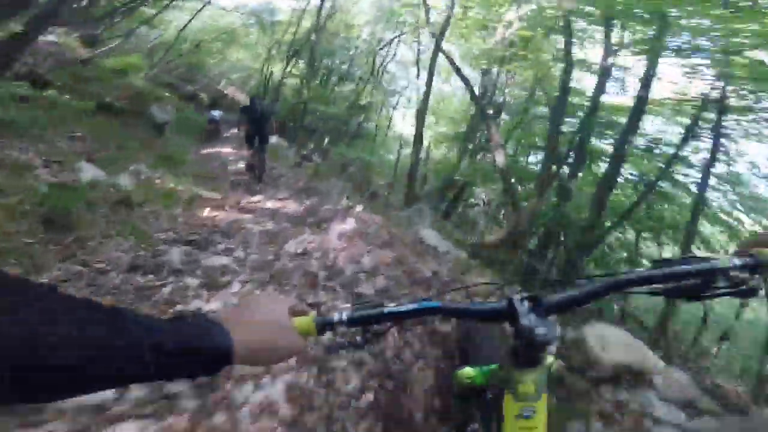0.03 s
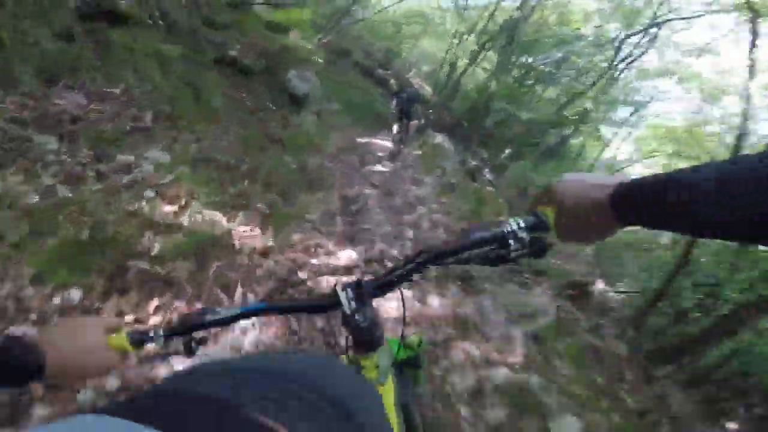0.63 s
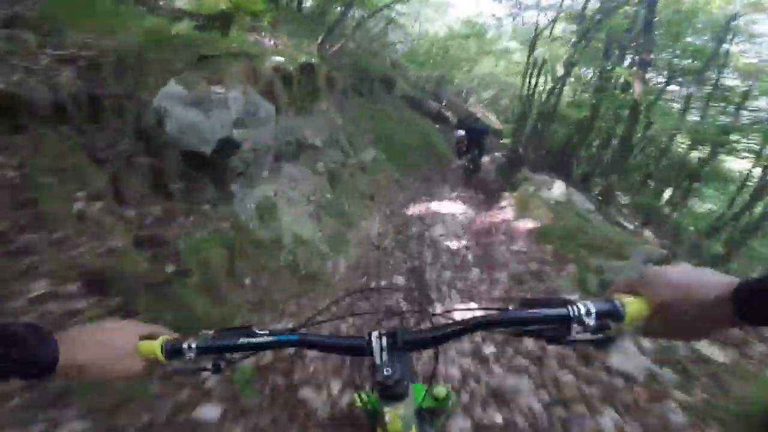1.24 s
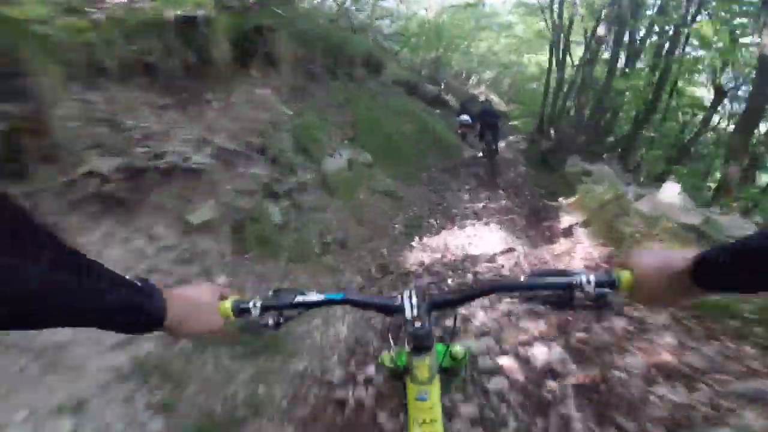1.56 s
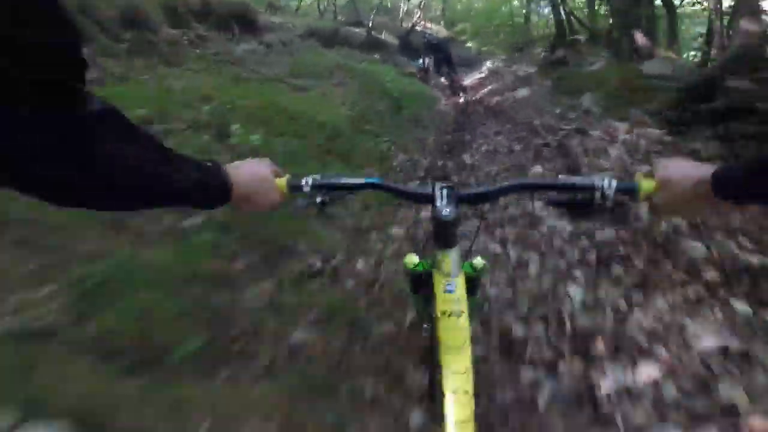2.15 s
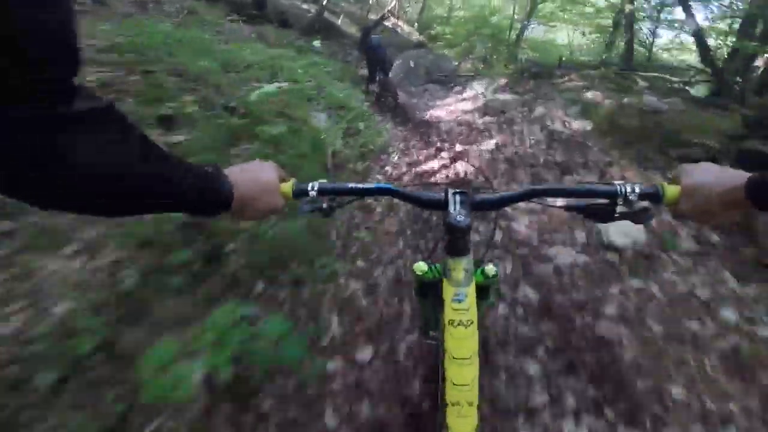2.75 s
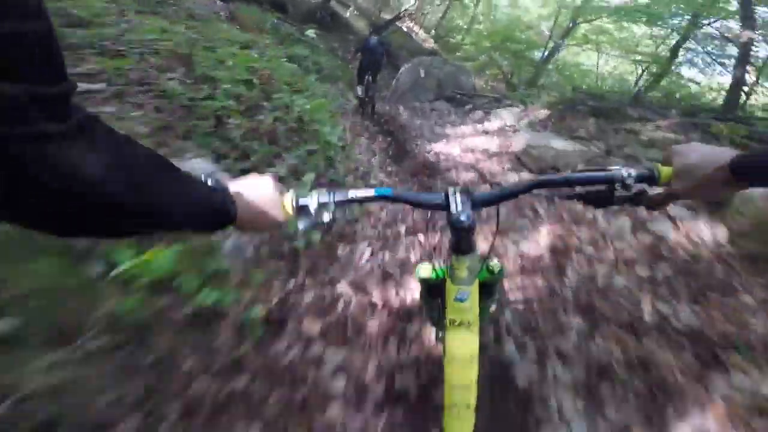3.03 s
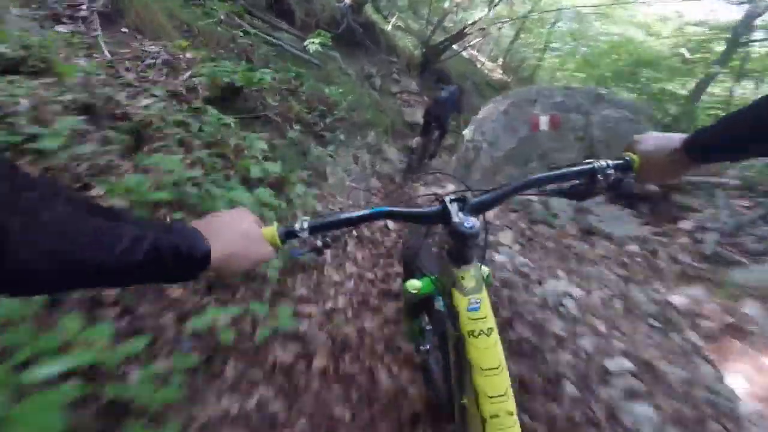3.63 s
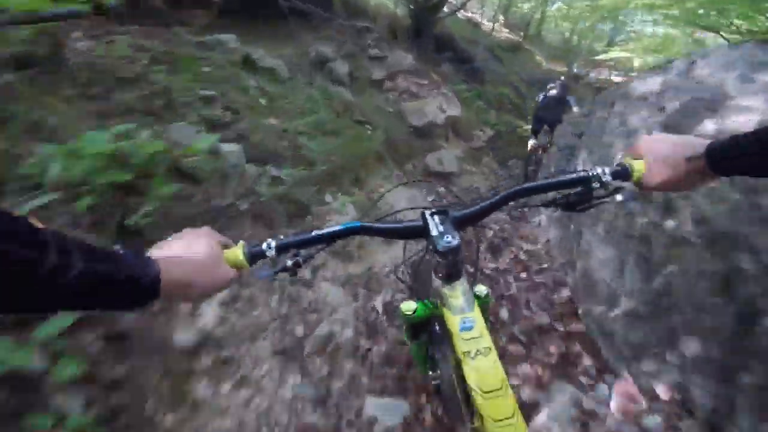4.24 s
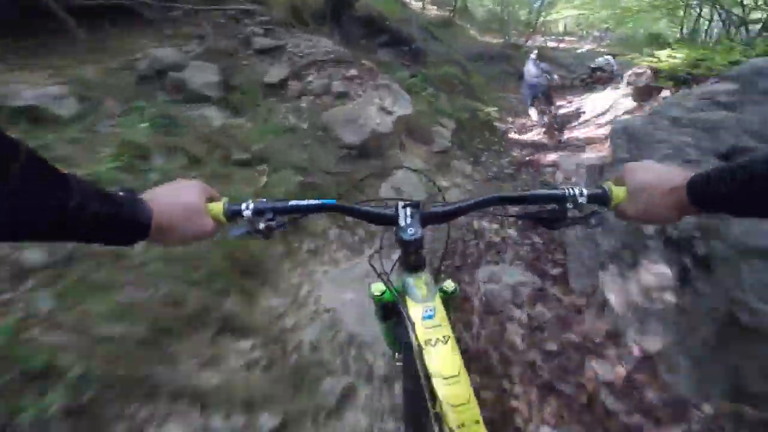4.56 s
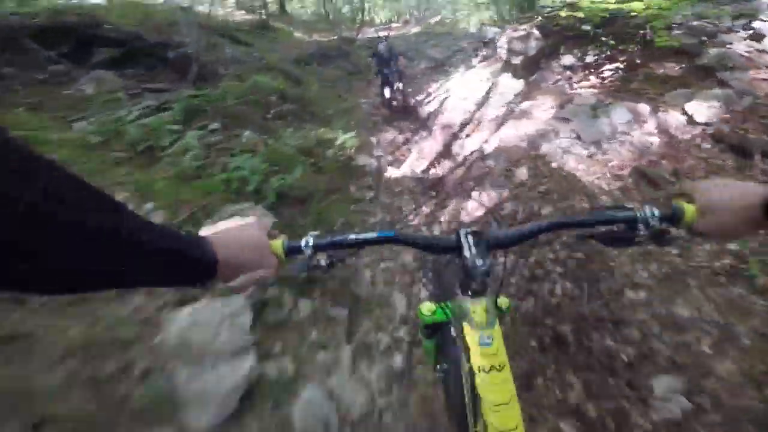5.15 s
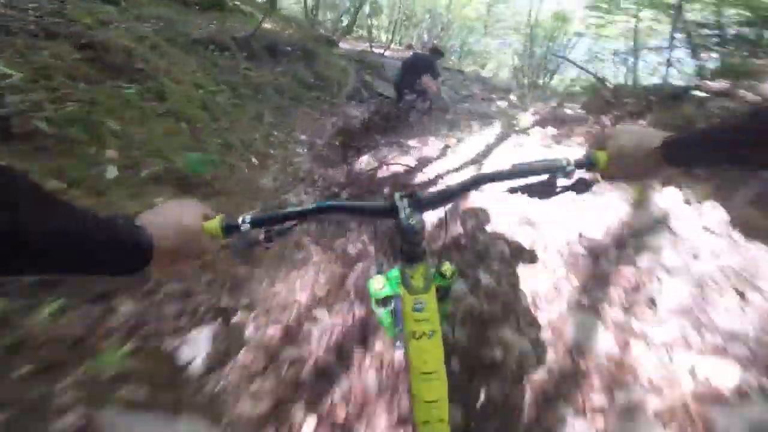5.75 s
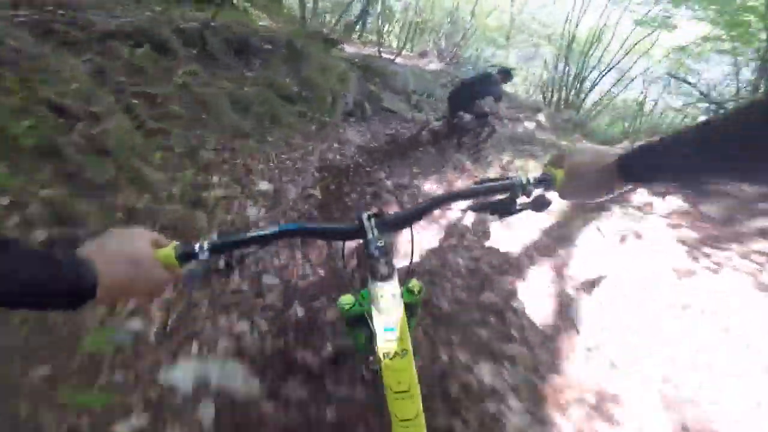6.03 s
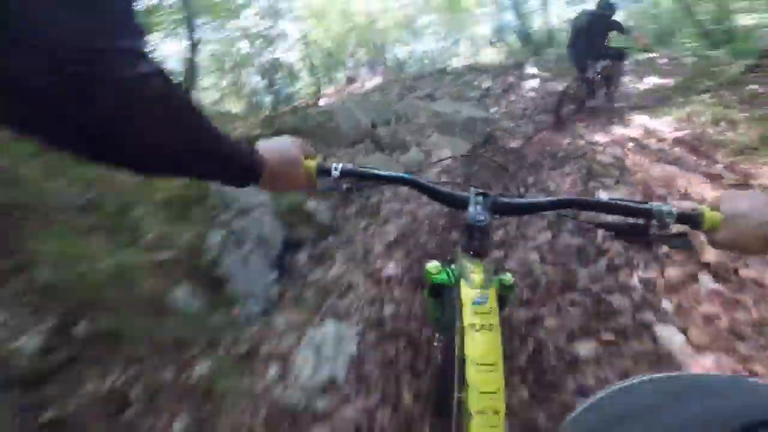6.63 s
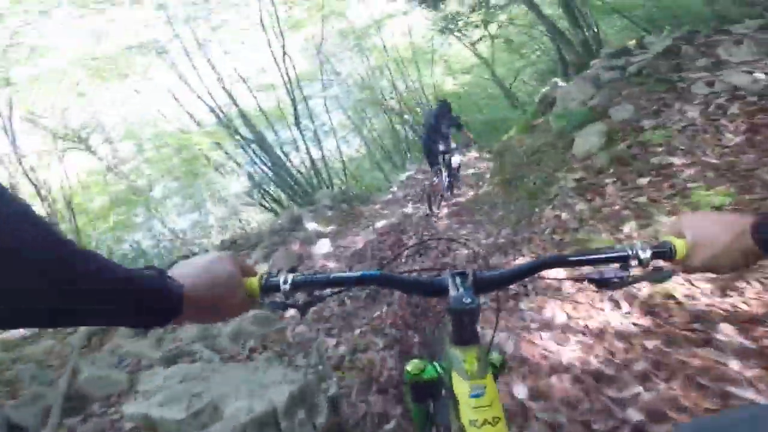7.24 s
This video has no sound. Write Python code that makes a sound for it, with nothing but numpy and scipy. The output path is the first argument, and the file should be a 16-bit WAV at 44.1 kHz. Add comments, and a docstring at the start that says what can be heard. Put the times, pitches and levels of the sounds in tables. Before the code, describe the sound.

Wind rumbles on a rider's microphone as bicycle tyres crackle through dry leaves and clack over loose stones, the bike thumping and ticking.

```python
"""A mountain bike rolls down a stony, leaf-covered forest trail, heard from a camera on the rider.
From the start air buffets the microphone, dry leaves crackle, bumps drum through tyres and frame, and
chain and cables tick. After a second the wind rises and the ground roughens; loose stones crunch and
clack, hardest near 3 s. The wind eases around 4 s and builds again, and near 6 s the tread slips on rock.
Short hops hush wind and tyres; after 7 s the ride quietens. Throughout, the camera case rings the treble."""
import sys
import numpy as np
from scipy import signal
from scipy.fft import rfft, irfft, next_fast_len
from scipy.io import wavfile
from scipy.ndimage import map_coordinates

SR = 44100
rng = np.random.default_rng(int(sys.argv[2]) if len(sys.argv) > 2 else 0)


def output_pcm(signal):
    """Save a mono or channel-first signal as 16-bit PCM at the path in sys.argv[1].

    Samples are clipped to [-1, 1] before scaling.
    """
    pcm = np.clip(np.atleast_2d(signal).T, -1, 1) * 32767
    wavfile.write(sys.argv[1], SR, np.round(pcm).astype(np.int16))


N = 330309


def amp(db):
    """Decibels to gain."""
    return 10 ** (np.asarray(db) / 20)


def unit(x):
    """x at rms 1."""
    return x / np.sqrt(np.mean(x ** 2) + 1e-20)


def automation(rows):
    """A fader ride: straight lines through (time_s, value) points."""
    time_s, values = np.transpose(rows)
    return np.interp(np.arange(N) / SR, time_s, values)


def gate(start_s, length_s, attack_s, release_s):
    """An envelope that opens around start_s, holds and closes once its length is over."""
    t = np.arange(N) / SR - start_s
    return np.clip(t / attack_s + .5, 0, 1) * np.clip(1 - (t - length_s) / release_s, 0, 1)


def wobble(rate):
    """A smooth random curve, rate knots a second."""
    return map_coordinates(rng.standard_normal(N // 50), [np.arange(N) * rate / SR], mode="wrap")


def filtered(x, response):
    """x through a complex frequency response."""
    size = 2 * next_fast_len(len(x) // 2 + 4096)
    return irfft(rfft(x, size) * response(np.fft.rfftfreq(size, 1 / SR)), size)[:len(x)]


def eq(x, points):
    """x through a minimum-phase EQ drawn by (freq_hz, gain_db) points."""
    freq_hz, gain_db = np.transpose(points)

    def response(hz):
        gain = amp(np.interp(np.log(hz + 1), np.log(freq_hz), gain_db))
        cepstrum = irfft(np.log(gain))
        half = len(cepstrum) // 2
        cepstrum[1:half] *= 2
        cepstrum[half + 1:] = 0
        return np.exp(rfft(cepstrum))
    return filtered(x, response)


def add(track, start_s, sound):
    """Mix a sound into the track at start_s."""
    part = track[max(round(start_s * SR), 0):][:len(sound)]
    part += sound[:len(part)]


def impacts(per_second, spread_db):
    """Randomly timed impulses of log-normal size, rms 1."""
    hits = rng.random(N) < per_second / SR
    polarity = np.sign(rng.standard_normal(N))
    return unit(hits * polarity * amp(spread_db * np.clip(rng.standard_normal(N), -2, 2)))


def grains(count, pitch_hz, pitch_spread, cycles, spread_db):
    """A cloud of small collisions, each a damped sine of its own pitch and size."""
    t = np.arange(int(SR * min(.02, 12 * cycles / pitch_hz))) / SR
    start = rng.integers(0, N, (count, 1))
    detune, size = np.clip(rng.standard_normal((count, 2)), -2, 2).T[:, :, None]
    turns = pitch_hz * np.exp(pitch_spread * detune) * t
    envelope = amp(spread_db * size) * np.exp(pitch_spread * detune / 2 - turns / cycles)
    pings = envelope * np.sin(2 * np.pi * turns) * rng.choice([-1, 1], (count, 1))
    samples = start + np.arange(len(t))
    return unit(np.bincount(samples.ravel(), pings.ravel(), N)[:N])


def tyre_load(per_second, settle_s):
    """The load on the tyres jumps at every stone and settles again; mean 0, rms 1."""
    kicks = rng.random(N) < per_second / SR
    load = np.sqrt(signal.lfilter([1], [1, -np.exp(-1 / (settle_s * SR))], kicks))
    return unit(load - load.mean())


# Fader ride of the airflow over the microphone: time_s, level_db
AIRFLOW = [(0, -18), (1.0, -18), (1.3, -13), (2.3, -14), (3.15, -17), (3.4, -17.5), (3.65, -15.5),
           (4.05, -22.5), (4.7, -21.5), (4.85, -18), (5.7, -16), (6.7, -15), (7.1, -22.5), (7.49, -24)]
# Gusts (+) and lulls (-) on top of it: start_s, length_s, change_db
GUSTS_AND_LULLS = [(0.01, 0.04, -3), (0.67, 0.1, -3.5), (0.965, 0.053, 1.5), (4.144, 0.042, 11),
                   (5.136, 0.18, -7.5), (6.844, 0.039, -10)]
# Bass-heavy tone of the buffeting: freq_hz, gain_db
WIND_EQ = [(5, -33), (22, 1.5), (75, 1.5), (120, -1.5), (200, -12), (350, -24.5), (700, -23.5), (2000, -55)]

def wind(lump_db=1.5, attack_s=0.028, release_s=0.019):
    """Eddies break on the microphone port in lumps; gusts and lulls ride on the airflow."""
    gust_db = sum(db * gate(s, length_s, attack_s, release_s) for s, length_s, db in GUSTS_AND_LULLS)
    eddies = eq(rng.standard_normal(N), WIND_EQ) * amp(lump_db * wobble(25))
    return amp(automation(AIRFLOW) + gust_db) * unit(eddies)


# Fader ride of the tyre noise, rising with speed: time_s, level_db
TYRE_NOISE = [(0, -37.5), (1.04, -37), (1.45, -32), (2.05, -33.5), (2.35, -30.5), (2.75, -33.5),
              (3.65, -34), (4.2, -38), (4.5, -32), (4.95, -31), (5.45, -33), (5.85, -30), (6.3, -33),
              (6.9, -30), (7.49, -35.5)]
# Crisp tone of dry leaves: freq_hz, gain_db
LEAF_EQ = [(100, -62), (700, 0.5), (2000, 12), (3200, 7), (4300, -0.5), (6500, 5), (8000, 1.5),
           (10200, -1.5), (15000, -8)]

def leaves(load, load_db=2.0, rustle_db=3, swell_db=1.0, trim_db=-1):
    """Dry leaves and twigs snap under the tyres, over a finer rustle; both swell at random."""
    snaps = grains(count=5000, pitch_hz=7300, pitch_spread=0.47, cycles=0.37, spread_db=-2.5)
    rustle = amp(rustle_db) * rng.standard_normal(N)
    pressed = (snaps + rustle) * amp(load_db * load + swell_db * wobble(27))
    return amp(automation(TYRE_NOISE) + trim_db) * unit(eq(pressed, LEAF_EQ))


# How hard the ground shakes the bike: time_s, level_db
GROUND_SHAKE = [(0, -31), (0.4, -27), (1.0, -23.5), (1.55, -21.5), (2.05, -16.5), (2.9, -16.5),
                (3.3, -25.5), (4.1, -26), (4.3, -22.5), (4.6, -19.5), (4.75, -28), (5.55, -34), (5.7, -15),
                (6.15, -24), (6.65, -18.5), (7.15, -19.5), (7.49, -34)]

def tread_hum(load, pitch_hz=308, width_hz=24, waver_hz=11, load_db=2, throb_db=2.5, trim_db=-4):
    """The tread keeps a hollow resonance of the bike sounding; it wavers and throbs with the ground."""
    phase = 2 * np.pi * np.cumsum(pitch_hz + waver_hz * wobble(8)) / SR
    ring = wobble(width_hz) * np.sin(phase) + wobble(width_hz) * np.cos(phase)
    throb = amp(load_db * load + throb_db * wobble(9))
    return amp(automation(GROUND_SHAKE) + trim_db) * unit(ring * throb)


# Low resonances of tyres, frame and mount: centre_hz, width_hz, gain_db
FRAME_MODES = [(157, 72, -0.5), (263, 109, 0.5), (326.3, 102, 0), (523, 250, -18.5)]

def frame_rumble(load, load_db=2.5, usual_shake_db=-23, usual_wind_db=-18, level_db=-20.5):
    """Small bumps drum on the bike's low resonances, louder with rougher ground and with airspeed."""
    def body(hz):
        return sum((-1) ** k * amp(db) * 1j * hz * width / (centre ** 2 - hz ** 2 + 1j * hz * width)
                   for k, (centre, width, db) in enumerate(FRAME_MODES))
    rough_db = 0.35 * (automation(GROUND_SHAKE) - usual_shake_db)
    speed_db = 0.58 * (automation(AIRFLOW) - usual_wind_db)
    bumps = impacts(per_second=600, spread_db=0.5) * amp(load_db * load)
    return amp(level_db + rough_db + speed_db) * unit(filtered(bumps, body))


# Scrapes of the tread over rock: start_s, length_s, level_db
TYRE_SLIPS = [(2.669, 0.012, -22), (5.775, 0.16, -31.5), (6.37, 0.062, -35)]

def tyre_slips(load, load_db=2.0, attack_s=0.012, release_s=0.027):
    """Grit trapped under a sliding tyre rasps brightly."""
    rasp = grains(count=3500, pitch_hz=2900, pitch_spread=0.2, cycles=3, spread_db=2)
    sliding = sum(amp(db) * gate(s, length_s, attack_s, release_s) for s, length_s, db in TYRE_SLIPS)
    return sliding * unit(rasp * amp(load_db * load))


# Patches of loose stones under the tyres: start_s, length_s, crunch_db, extra_cobbles_db
LOOSE_PATCHES = [(0.358, 0.058, -25, 6), (0.788, 0.031, -22, -1), (1.155, 0.17, -28, 3),
                 (1.463, 0.23, -25, -9), (1.776, 0.035, -17.5, 2), (1.934, 0.061, -34, 15),
                 (2.679, 0.28, -29, 11), (3.023, 0.13, -26, -1), (3.898, 0.36, -32.5, 9),
                 (4.263, 0.47, -28.5, 6.5), (4.972, .15, -24.5, 4), (5.309, 0.0086, -13.5, -17),
                 (5.647, 0.45, -21, 1), (6.254, 0.031, -20.5, 9), (6.368, 0.071, -19, 3),
                 (6.511, 0.16, -21.5, 2.5), (6.764, 0.244, -25.5, 3), (7.265, 0.1, -26, 0)]
# Midrange tone of the crunch: freq_hz, gain_db
CRUNCH_EQ = [(200, -20), (450, 9), (700, 0), (1000, 1.5), (1450, -5), (2400, -4.5), (3300, -4.5),
             (4500, -8), (8000, -41), (14000, -109)]

def stone_crunch(load, load_db=1.5, cobble_db=-4, grit_db=-4, usual_tyre_db=-35, trim_db=-3):
    """Cobbles knock, gravel clicks and grit grinds: a thin bed that follows speed, and loud patches."""
    speed_db = automation(TYRE_NOISE) - usual_tyre_db
    fine_gain = amp(-30 + 0.71 * speed_db)
    coarse_gain = amp(-31 + 1.6 * speed_db)  # cobbles grow faster with speed
    for start_s, length_s, crunch_db, extra_db in LOOSE_PATCHES:
        patch = amp(crunch_db) * gate(start_s, length_s, attack_s=0.018, release_s=0.0081)
        fine_gain = np.hypot(fine_gain, patch)
        coarse_gain = np.hypot(coarse_gain, amp(extra_db) * patch)
    cobbles = grains(count=2400, pitch_hz=834.6, pitch_spread=0.2743, cycles=9.0, spread_db=1.5)
    gravel = grains(count=9000, pitch_hz=1605, pitch_spread=0.497, cycles=4.1, spread_db=2.0)
    grit = amp(grit_db) * rng.standard_normal(N)
    pressure = amp(load_db * load)
    coarse = coarse_gain * unit(eq(cobbles * pressure, CRUNCH_EQ))
    fine = fine_gain * unit(eq((gravel + grit) * pressure, CRUNCH_EQ))
    return amp(trim_db) * (amp(cobble_db) * coarse + fine)


# Chain and cables striking the frame: start_s, level_db, brightness_db
CHAIN_HITS = [(0.469, -19, -2), (0.669, -18, 1), (0.7184, -17, -1), (1.133, -6, -6), (1.23, -10, -17),
              (1.2867, -17.5, -28), (1.5986, -11, -30), (1.7704, -12.5, -23), (1.8183, -17, -22),
              (2.0803, -18.5, -30), (2.3959, -14, -31), (2.4375, -14, -16), (2.5197, -12.5, -30),
              (2.5312, -7, -28), (3.159, -13, -17), (4.041, -10.5, -24), (4.571, -11, -33),
              (4.802, -11.5, -36), (4.832, -15.5, -33), (4.9332, -12, -40), (5.094, -12.5, -19),
              (5.1998, -13, -43), (5.857, -10.5, -36), (6.133, -16, -25), (6.463, -17, -26),
              (6.9285, -16, -23), (7.102, -15.5, -40), (7.4496, -18, -21)]
# Bright tone of steel: freq_hz, gain_db
STEEL_EQ = [(800, 2.2), (2000, 7.8), (5500, 8), (7000, 11.2), (10000, 8.9), (15000, 13)]

def chain_ticks(snap_s=0.0023, chatter_s=0.0033, chatter_db=-16, usual_bright_db=-16, trim_db=12):
    """Steel snaps against the frame and chatters briefly; sharper contacts are brighter and shorter."""
    track, t = np.zeros(N), np.arange(SR // 20) / SR
    for start_s, level_db, bright_db in CHAIN_HITS:
        shelf_db = 0.86 * (bright_db - usual_bright_db)
        fade = np.exp(-t * amp(shelf_db / 2) / snap_s) + amp(chatter_db) * np.exp(-t / chatter_s)
        steel = eq(rng.standard_normal(len(t)) * fade, STEEL_EQ)
        tick = eq(steel, [(5500, 0), (9000, shelf_db), (13000, shelf_db - 2.5)])
        add(track, start_s, amp(level_db + trim_db) * tick / np.linalg.norm(tick))
    return track


# Single stones knocked by the tyres: start_s, level_db, pitch_hz
STONE_HITS = [(0.378, -12, 1150), (0.392, -12, 850), (0.482, -17, 800), (0.532, -18, 1400),
              (1.18, -13, 1500), (1.218, -11, 640), (1.263, -14, 560), (1.306, -14, 740),
              (1.318, -13, 2000), (1.378, -14, 900), (1.596, -5, 1750), (1.796, -9, 1500), (2.435, -9, 800),
              (2.531, -9, 1500), (2.704, -13, 680), (2.923, -7, 660), (2.944, -10, 520), (2.977, -13, 2250),
              (3.073, -13, 1900), (3.133, -1, 1430), (3.47, -16, 1600), (3.899, -16, 2200),
              (4.122, -12, 1600), (4.827, -10, 1450), (4.984, -12, 950), (5.054, -10, 1450),
              (5.393, -14, 1100), (5.528, -14, 1070), (5.623, -9, 1090), (5.731, -11, 1800),
              (5.984, -7, 820), (6.288, -12, 1600), (6.358, -7, 1200), (6.46, -8, 2400), (6.478, -8, 883),
              (6.497, -8, 1900), (6.738, -5, 900)]
# Ring of a knocked stone: pitch_ratio, gain_db
STONE_PARTIALS = [(1, 0.5), (1.16, -3), (1.41, -6), (1.85, -15)]

def stone_clacks(rise_s=.0004, ring_s=.0055, usual_hz=1000, crack_db=1, crack_s=.003, trim_db=1.5):
    """A bigger stone knocks: a gritty crack and a short ring of close modes, longer in low stones."""
    track, t = np.zeros(N), np.arange(SR // 16) / SR
    for start_s, level_db, pitch_hz in STONE_HITS:
        band = signal.butter(3, [.55 * pitch_hz, pitch_hz + 1200], "bandpass", fs=SR, output="sos")
        crack = unit(signal.sosfilt(band, rng.standard_normal(len(t)))) * np.exp(-t / crack_s)
        partials = sum(amp(db) * np.sin(2 * np.pi * (pitch_hz * ratio * t + rng.random()))
                       for ratio, db in STONE_PARTIALS)
        ring = partials * np.exp(-t / ring_s * np.sqrt(pitch_hz / usual_hz))
        clack = (ring + amp(crack_db) * crack) * (1 - np.exp(-t / rise_s))
        add(track, start_s, amp(level_db + trim_db) * clack / np.abs(clack).max())
    return track


# Hard bumps through the suspension: start_s, level_db, pitch_hz
WHEEL_HITS = [(0.1, -3, 92), (0.171, -9, 111), (0.233, -14, 142), (0.377, -8, 325), (0.448, -12, 88.5),
              (0.634, -2, 122), (0.854, -4, 144), (0.921, -7.5, 330), (1.085, -2.5, 106), (1.215, -10, 204),
              (1.257, 2, 130), (1.304, -4, 190), (1.545, -7.5, 131), (1.8, -1, 172), (1.882, -1.5, 130),
              (1.985, -4, 283), (2.31, -1.5, 321), (2.467, -3, 110), (2.6, 0, 115), (2.67, -8, 303),
              (3.041, 0.5, 84), (3.161, 1.5, 143), (3.387, -5.5, 316), (3.629, -2.5, 153), (4.173, -8, 87),
              (4.825, -2, 123), (4.878, -2.5, 95), (5.051, -6, 160), (5.36, -1, 88), (5.419, -2.5, 100),
              (5.519, -5.5, 123), (5.997, -4.5, 129), (6.252, -3, 112), (6.545, -2.5, 172),
              (6.591, -1.5, 318), (6.786, -6, 324), (7.143, -10, 245)]

def wheel_thuds(rise_s=0.0025, fade_s=.014, overtone_ratio=1.7, overtone_db=-7):
    """A wheel meets a rock and the bike shudders for a few cycles; a higher mode dies sooner."""
    track, t = np.zeros(N), np.arange(SR // 6) / SR
    for start_s, level_db, pitch_hz in WHEEL_HITS:
        fade = np.exp(-t / fade_s)
        phase = 2 * np.pi * pitch_hz * t
        shudder = np.sin(phase) + amp(overtone_db) * fade * np.sin(overtone_ratio * phase)
        add(track, start_s, amp(level_db) * shudder * fade * (1 - np.exp(-t / rise_s)))
    return track


# Dips where the bike goes light over a crest: start_s, length_s, change_db
CREST_HOPS = [(0.754, 0.022, -4), (5.134, 0.19, -2), (6.178, 0.062, -4.5), (6.294, 0.04, -1.5),
              (7.063, 0.15, -3)]

def scene(attack_s=0.015, release_s=0.011, wind_share=0.99):
    """One jolting tyre load drives all the rolling; hops duck wind and rolling, with the hits on top."""
    load = tyre_load(per_second=46, settle_s=0.0072)
    duck_db = sum(db * gate(s, length_s, attack_s, release_s) for s, length_s, db in CREST_HOPS)
    rolling = tread_hum(load) + frame_rumble(load) + stone_crunch(load) + tyre_slips(load) + leaves(load)
    bed = amp(wind_share * duck_db) * wind() + amp(duck_db) * rolling
    return (bed + stone_clacks() + chain_ticks() + wheel_thuds())[None]


# Treble ring of the camera case: freq_hz, gain_db
CASE_EQ = [(3500, -2), (4400, -3), (5050, 9), (5500, 13), (6150, 3.5), (10200, 5), (11500, -9.5),
           (12400, -14), (13600, -6), (15500, -20)]

def record(dry, ceiling=.95, high_cut_hz=15650):
    """The case colours the sound, a soft clip rounds the peaks, and a steep cut ends the treble."""
    inside = eq(dry[0], CASE_EQ)
    rounded = inside / (1 + (inside / ceiling) ** 6) ** (1 / 6)
    return filtered(rounded, lambda hz: hz < high_cut_hz)[None]


dry = scene()
out = record(dry)
output_pcm(out)
```